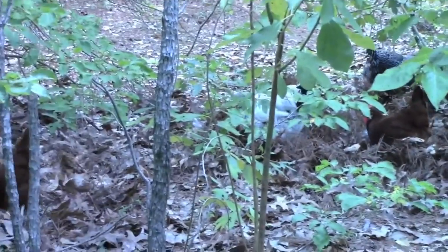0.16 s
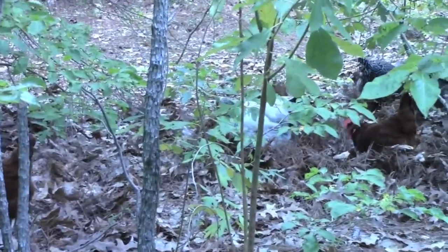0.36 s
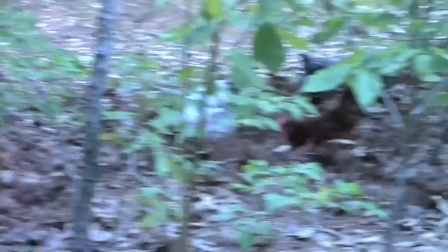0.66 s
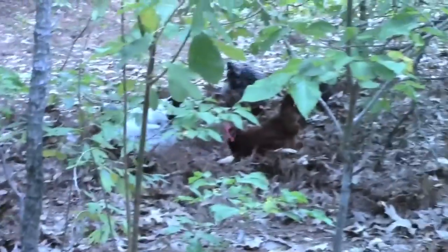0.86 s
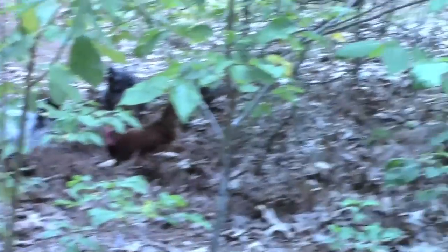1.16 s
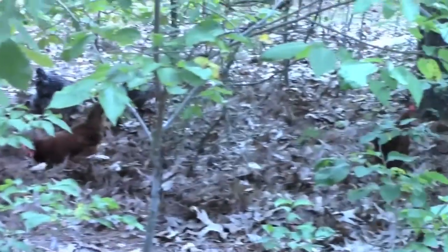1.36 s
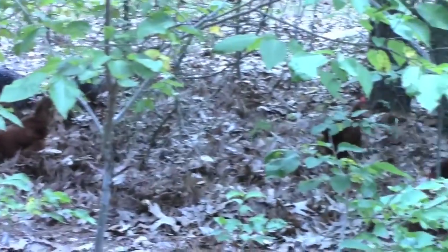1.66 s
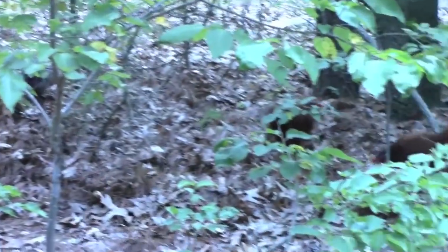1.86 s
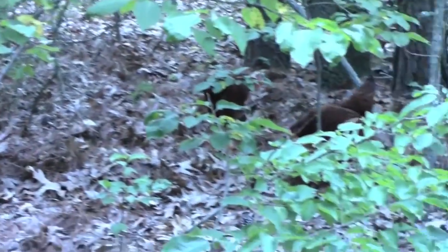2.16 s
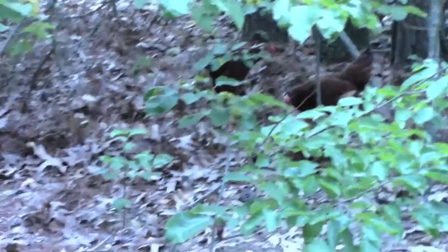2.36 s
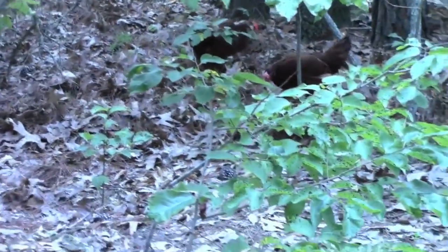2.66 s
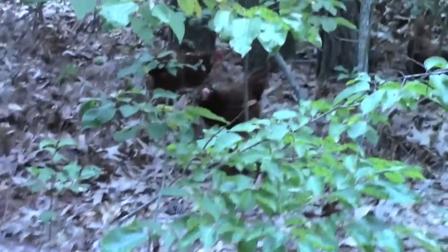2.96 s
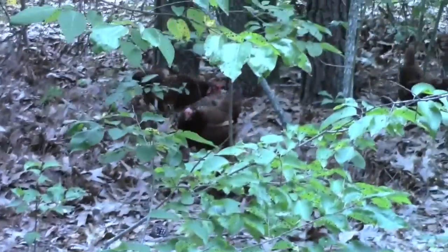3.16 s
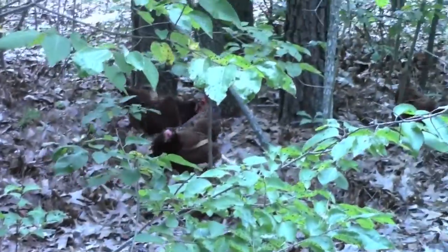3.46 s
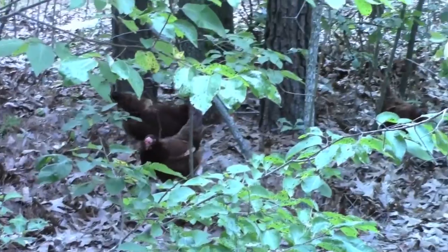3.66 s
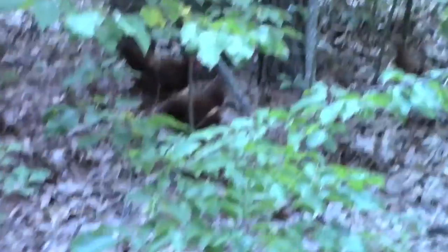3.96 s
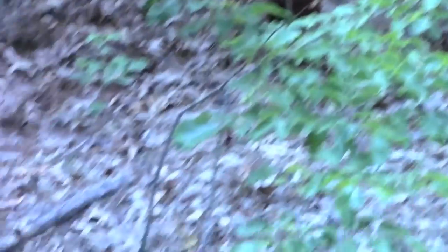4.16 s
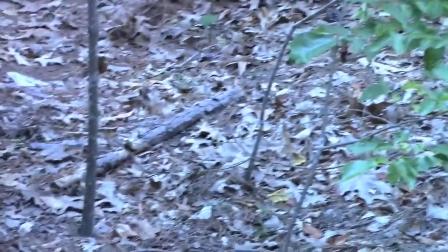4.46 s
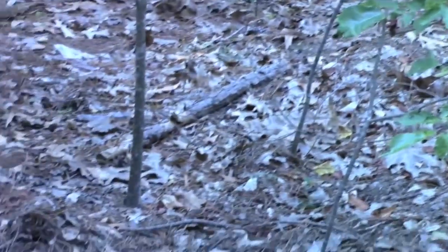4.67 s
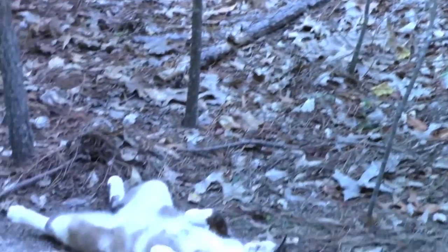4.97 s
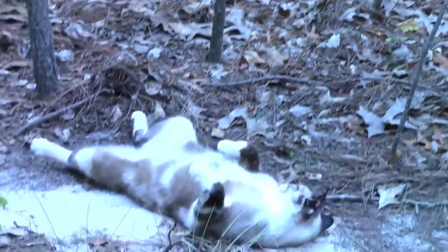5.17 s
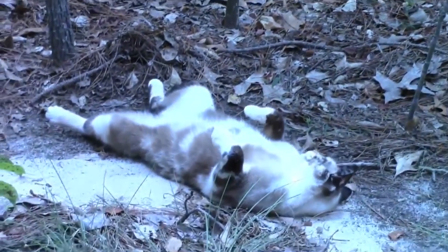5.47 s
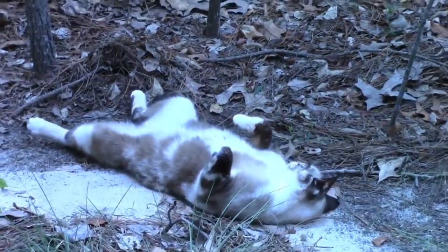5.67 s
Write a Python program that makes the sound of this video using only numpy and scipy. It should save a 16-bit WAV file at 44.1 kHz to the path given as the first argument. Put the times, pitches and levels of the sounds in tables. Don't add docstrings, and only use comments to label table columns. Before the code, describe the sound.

Hens scratch through dry leaves and pine straw in bursts, growing closer and louder, after one early cat mew, over a faint engine hum.

```python
import sys
import numpy as np
from scipy import signal
from scipy.fft import rfft, irfft
from scipy.io import wavfile
from scipy.ndimage import uniform_filter1d

SR = 44100
rng = np.random.default_rng(int(sys.argv[2]) if len(sys.argv) > 2 else 0)


def log_audio(samples):
    frames = np.atleast_2d(samples).T
    limited = np.clip(frames, -1, 1)
    pcm = np.round(limited * 32767).astype(np.int16)
    wavfile.write(sys.argv[1], SR, pcm)


def amplitude_ratio(level_db):
    exponent = np.asarray(level_db, float) / 20
    return 10 ** exponent


N = 257103
T = np.arange(N) / SR

# hz, level_db_per_hz
AIR_SPECTRUM = [(100, -3), (170, 2.5), (205, -1.5), (663, -2), (1310, -8), (1520, -5.5), (2690, -8.5),
                (5110, -10), (8200, -13.5), (10300, -19.5), (15600, -22)]
HISS_SPECTRUM = [(200, -42), (500, -10.5), (800, -1.0)] + AIR_SPECTRUM[4:]
# hz, level_db_per_hz
WASH_SPECTRUM = [(100, -17), (180, 0), (450, -1.5), (700, -5), (1200, -45), (3000, -60)]
RUMBLE_SPECTRUM = [(12, -24), (25, 5.5), (60, 0.5), (130, 2.0), (180, -26), (300, -61)]
# peak_s, extra_db, length_s
WASH_SWELLS = [
    (.12, 2, 0.27),
    (0.757, 3, 0.17),
    (1.72, 1.5, 0.38),
    (3.425, 3, .07),
    (5.2, 1.2, 1),
]
# hz, level_db_per_hz
APART_SPECTRUM = [(12, -39), (20, -13), (65, -2.5), (240, -3.5), (340, -5.5), (800, -13), (1300, -20.5),
                  (2500, -33.5), (5000, -43.5), (16000, -41)]
# peak_s, level_db, length_s
GUSTS = [
    (0.25, -50, .09),
    (0.681, -55, .04),
    (0.9, -57, 0.077),
    (3.4, -63, .05),
    (5.75, -53, 0.06),
]
PUFF_SPECTRUM = [(10, -18), (25, -10), (60, -10), (120, -36), (300, -63)]  # hz, level_db_per_hz
HISS_DB, WASH_DB, RUMBLE_DB, APART_DB = -54.5, -57, -56, -55

# start_s, firing_rate_hz, loudness_db
ENGINE = [(0, 25.53, -51), (.18, 26.2, -45.5), (.45, 26.36, -52.5), (.89, 26.1, -47), (1.64, 26.16, -54),
          (1.88, 26.85, -56.5), (2.32, 26.18, -59), (2.94, 26.5, -49), (3.46, 26.4, -57.5),
          (3.9, 26.2, -52), (4.17, 26.35, -59.5), (4.71, 26.5, -48), (5.1, 26.5, -53), (5.38, 26.1, -51.5),
          (5.83, 26.1, -59)]
# order, relative_db, share_of_wavering, own_flutter_db, fade_db_per_s
ENGINE_ORDERS = [
    (5, 0, 0.84, .6, 0),
    (6, -2.5, 0.5, 2, -1.36),
    (3, -3.5, .3, 2.5, -1),
    (2, -8.5, .3, 4, 0.28),
]

# start_s, pitch_hz, effort_db, mouth_resonance_hz, mouth_gain_db
MEW = [
    (.02, 472, -56, 2000, -4),
    (.038, 476, -51.5, 2120, 0),
    (.09, 537, -55, 2380, 12),
    (.107, 525.6, -54.5, 2310, 12),
    (.175, 559, -53.5, 2370, 9),
    (.24, 543, -55, 2380, 6),
    (.33, 536, -51.5, 1900, -5.5),
    (.398, 506, -58, 1900, -22),
    (.436, 413, -59, 1900, -26),
]
THROAT_HZ, THROAT_WIDTH_HZ, MOUTH_WIDTH_HZ = 980, 500, 1460
MOUTH_SHARPEN = 0.95
CHEST_DB = -12

# start_s, peak_db, pitch_hz
STRAW_TICKS = [(0.3247, -29.5, 4360), (0.579, -34, 7300), (1.0694, -27, 3970), (1.3671, -34, 3400),
               (1.5433, -25, 6600), (1.5701, -27, 6500), (1.643, -22.5, 4200), (1.849, -31, 5000),
               (2.0069, -30, 3500), (2.095, -32, 5000), (2.217, -28, 6000), (2.3988, -35, 7990),
               (2.6826, -34, 7700), (3.338, -19.5, 4200), (3.5349, -28, 4700), (3.8390, -31, 4970),
               (3.8515, -20, 7000), (4.1014, -29, 4200), (5.035, -31, 4110), (5.13, -27, 8500)]
STRAW_RING_MS, STRAW_KNOCK_DB = 0.098, -20.5
# start_s, peak_db, pitch_hz, ring_ms, low_knock_db
TWIGS = [(1.768, -24.5, 9600, .4, -20), (1.775, -30, 4000, .4, -15), (2.1630, -29, 4000, .46, -6),
         (2.805, -30, 3230, 0.68, -8), (2.9530, -34, 3930, .6, -17), (3.2450, -32, 3970, .89, -16),
         (3.4225, -24, 3560, 0.55, -13), (3.581, -24, 9500, 0.31, -5), (3.5823, -23.5, 9800, .4, -9),
         (3.583, -25, 13500, .4, -20), (3.5832, -24.5, 3500, 0.46, -9), (3.6966, -21.5, 5100, .5, -30),
         (3.6967, -27, 8040, .3, -34), (3.6965, -27, 13000, .25, -30), (3.8426, -20.5, 3300, .8, -11),
         (3.8453, -13.5, 6500, 0.12, -11.5), (3.856, -25, 9400, 1.5, -12), (4.3690, -31, 3830, 0.94, 3),
         (4.3870, -23, 6000, 0.45, 7), (4.8910, -34, 8200, .52, -20), (4.9300, -34, 10000, .5, -22),
         (5.0986, -29, 7050, 0.56, -20), (5.417, -25, 9900, 1.0, -20)]

LAYER_HZ = [
    1890,
    4200,
    7780,
    13300,
]
# hz, level_db
LITTER_COLOUR = [(500, -25), (900, -21), (1500, -14), (2500, -10.5), (3800, -8), (5000, -12.5), (6300, -7),
                 (7600, -9.5), (10000, -3.5), (12500, -6), (15000, -20)]
# start_s, extra_db, fade_s
CLAW_ONSETS = [(0.44, 3, .02), (1.505, 4, .04), (2.715, 4, .015), (2.80, 3, .015), (2.953, 3, .02),
               (3.415, 3, .025), (3.62, 3, .012), (3.765, 3, .02), (4.10, 2.5, .03), (4.366, 2.5, .02),
               (4.632, 3, .02), (5.523, 3, .015), (5.31, 3, .025), (5.405, 2.5, .02)]
# peak_s, effort_db, rise_s, fall_s, fine_straw_db
FLOCK = [(0, -52.5, .1, 0.26, 5.5), (.13, -58, .1, .1, -2), (.23, -45.5, 0.089, 0.1, 2.5),
         (.36, -54, 0.058, 0.046, 0), (.47, -57, .025, 0.073, 4.5), (.57, -47.5, 0.11, 0.32, 3.5),
         (.74, -50.5, 0.092, 0.098, 0.5), (.9, -51, 0.14, 0.35, 1.5), (1.06, -53.5, 0.16, 0.11, -1),
         (1.23, -53.5, 0.088, 0.09, 3.5), (1.45, -51.5, 0.066, 0.049, 0), (1.55, -48, 0.083, 0.32, -0.5),
         (1.77, -51.5, 0.17, 0.075, 8.5), (1.96, -49, 0.12, 0.15, 0.5), (2.17, -47, 0.12, 0.094, 2),
         (2.23, -51, .05, 0.04, 4), (2.295, -52.5, .03, 0.027, -0.5)]
# peak_s, effort_db, rise_s, fall_s, fine_straw_db
PAIR = [(2.7, -53.5, .12, 0.096, 2.5), (2.8, -50.5, 0.08, 0.21, 3), (2.96, -48.5, 0.075, 0.43, 1),
        (3.16, -47, 0.061, 0.11, 2.5), (3.25, -43, 0.17, 0.11, 0), (3.44, -45.5, 0.1, .12, 0.5),
        (3.56, -47, 0.055, .15, 2.5), (3.68, -47, .07, 0.086, -3.5), (3.8, -47, 0.092, 0.14, 2),
        (3.849, -37, 0.017, 0.039, 1), (3.89, -42.5, 0.022, 0.18, 1), (4.16, -44.5, 0.091, 0.36, 1.2),
        (4.4, -40.5, 0.075, 0.12, 1.8), (4.51, -51, 0.091, 0.052, 4)]
# peak_s, effort_db, rise_s, fall_s, fine_straw_db
NEAREST = [
    (4.65, -53, 0.084, .1, -1),
    (4.8, -53, 0.23, .2, 1.5),
    (4.92, -52, 0.066, 0.064, 0.5),
    (5.0, -53.5, .1, .15, -1.5),
    (5.17, -49.5, 0.12, 0.042, -1),
    (5.235, -36.5, 0.056, 0.11, -4),
    (5.32, -39.5, 0.098, 0.055, -2),
    (5.39, -38, 0.056, 0.065, 0),
    (5.64, -40, 0.28, 0.24, -1.5),
    (5.83, -44, 0.16, .2, 0),
]
STROKE_BEND = 1.42
REST_DB, REST_STRAW_DB = -66, 7.5
USUAL_DB = -50
COARSE_DB, COARSE_PER_DB, COARSE_PER_STRAW = -3, -0.1, 0.24
DUST_DB, DUST_PER_DB, DUST_PER_STRAW = -7.5, 0.05, 0.97


def evened(x):
    return x / np.sqrt(np.mean(x ** 2) + 1e-20)


def read(points, hz):
    f, value = np.transpose(points)
    return np.interp(np.log(hz + 1), np.log(f + 1), value)


def columns(rows, t):
    s, *values = np.transpose(rows)
    return [np.interp(t, s, v) for v in values]


def drift(seconds):
    size = max(int(seconds * SR), 1)
    once = uniform_filter1d(rng.standard_normal(N), size)
    return evened(uniform_filter1d(once, size))


def coloured(points):
    hz = np.fft.rfftfreq(N, 1 / SR)
    spectrum = rfft(rng.standard_normal(N)) * amplitude_ratio(read(points, hz))
    return evened(irfft(spectrum, N))


def swell(peak_s, length_s):
    return np.exp(-((T - peak_s) / length_s) ** 2)


def harmonics(hz, levels, orders, jitter):
    turns = np.cumsum(hz * (1 + jitter[:len(hz)])) / SR
    out = 0
    for k, db in zip(orders, levels):
        out = out + np.sqrt(2) * amplitude_ratio(db) * np.sin(2 * np.pi * (k * turns + rng.random()))
    return out


def click(hz, ring_s, grit):
    t = np.arange(300) / SR
    wobble = np.cumsum(rng.standard_normal(300)) * grit
    attack = 1 - np.exp(-t * hz * 5.3)
    return np.sin(2 * np.pi * hz * t + wobble) * np.exp(-t / ring_s) * attack


def trees(x, t60, db, count=8):
    t = np.arange(SR // 5) / SR
    turn = (T * 40).astype(int) % count
    out = x.copy()
    for k in range(count):
        tail = rng.standard_normal(len(t)) * amplitude_ratio(-60 * t / t60) * (t > .001)
        out += amplitude_ratio(db) * signal.oaconvolve(x * (turn == k), tail / np.linalg.norm(tail))[:N]
    return out


def air():
    wash_db = WASH_DB + sum(db * swell(s, length) for s, db, length in WASH_SWELLS)
    common = amplitude_ratio(HISS_DB + 0.5 * drift(0.21)) * coloured(HISS_SPECTRUM)
    common += amplitude_ratio(wash_db) * coloured(WASH_SPECTRUM)
    common += amplitude_ratio(RUMBLE_DB + 2.0 * drift(0.42)) * coloured(RUMBLE_SPECTRUM)
    puffs = sum(amplitude_ratio(db) * swell(s, length) for s, db, length in GUSTS)
    apart = amplitude_ratio(APART_DB) * coloured(APART_SPECTRUM) + puffs * coloured(PUFF_SPECTRUM)
    return np.array([common + apart, common - apart])


def engine():
    hz, loud = columns(ENGINE, T)
    wavering = loud - loud.mean()
    levels = []
    for _, db, share, flutter_db, fade_db in ENGINE_ORDERS:
        levels.append(loud.mean() + db + share * wavering + flutter_db * drift(0.076) + fade_db * T)
    orders = [row[0] for row in ENGINE_ORDERS]
    hum = harmonics(hz, levels, orders, .002 * drift(.1))
    fourth = np.sin(2 * np.pi * 4 * np.cumsum(hz) / SR)
    hum = hum + amplitude_ratio(-63.0 + 1.2 * drift(0.24)) * fourth
    return np.array([hum * amplitude_ratio(0.4), np.roll(hum, 24) * amplitude_ratio(-0.1)])


def cat():
    start, end = round(MEW[0][0] * SR), round(MEW[-1][0] * SR)
    t = T[start:end]
    hz, effort, mouth_hz, mouth_db = columns(MEW, t)
    partial = np.arange(1, 6)[:, None] * hz
    throat = amplitude_ratio(-10 * ((partial - THROAT_HZ) / THROAT_WIDTH_HZ) ** 2)
    mouth_width = MOUTH_WIDTH_HZ * amplitude_ratio(-MOUTH_SHARPEN * np.maximum(mouth_db, 0))
    mouth = amplitude_ratio(mouth_db - 10 * ((partial - mouth_hz) / mouth_width) ** 2)
    levels = effort + 10 * np.log10(throat ** 2 + mouth ** 2)
    levels[0] = effort + CHEST_DB
    voice = harmonics(hz, levels, range(1, 6), 0.0044 * drift(0.0091))
    voice = voice * signal.windows.tukey(len(t), .08)
    out = np.zeros(N)
    out[start:end] = voice * amplitude_ratio(1.1 * drift(0.01)[:len(t)])
    return out


def snaps():
    out = np.zeros(N + 300)
    stems = [(*tick, STRAW_RING_MS, STRAW_KNOCK_DB) for tick in STRAW_TICKS]
    for s, db, hz, ring_ms, knock_db in list(TWIGS) + stems:
        ring = click(hz, ring_ms / 1000, grit=.2)
        sound = ring + amplitude_ratio(knock_db) * click(2600, .0005, grit=.1)
        out[round(s * SR):][:300] += amplitude_ratio(db) * sound / abs(sound).max()
    no_bass = signal.butter(2, 800, "high", fs=SR, output="sos")
    return trees(signal.sosfilt(no_bass, out[:N]), t60=0.041, db=-5, count=4)


def strokes():
    t = T[::40]
    power = amplitude_ratio(2 * REST_DB) + 0 * t
    straw = power * REST_STRAW_DB
    for s, db, rise, fall, straw_db in list(FLOCK) + list(PAIR) + list(NEAREST):
        away = abs(t - s) / np.where(t < s, rise, fall)
        stroke = amplitude_ratio(2 * (db - 10 * away ** STROKE_BEND))
        power = power + stroke
        straw = straw + stroke * straw_db
    effort = np.interp(T, t, 10 * np.log10(power))
    straw = np.interp(T, t, straw / power)
    more = effort - USUAL_DB
    coarse = COARSE_DB + COARSE_PER_DB * more + COARSE_PER_STRAW * straw
    dust = DUST_DB + DUST_PER_DB * more + DUST_PER_STRAW * straw
    return effort, coarse, straw, dust


def litter(count=34):
    effort, coarse, straw, dust = strokes()
    clumps_db = .8 * drift(.003) + .4 * drift(.008)
    for s, db, fade in CLAW_ONSETS:
        clumps_db += db * (T > s) * np.exp(-abs(T - s) / fade)
    layers = np.array([coarse, 0 * effort, straw, dust])
    out = np.zeros(N)
    for hz in np.geomspace(500, 15600, count):
        place = np.interp(np.log(hz), np.log(LAYER_HZ), range(4))
        share = np.clip(1 - abs(place - np.arange(4)), 0, 1)
        at = np.flatnonzero(rng.random(N) < .35 * hz / SR)
        big = rng.exponential(1, N)[at]
        sign = np.sign(np.sin(1e6 * big))
        train = np.zeros(N)
        train[at] = sign * amplitude_ratio(2.03 * np.minimum(big, 4.6))
        train = evened(train)
        level_db = effort + clumps_db + share @ layers
        train[at] *= amplitude_ratio(level_db[at] + read(LITTER_COLOUR, hz))
        grain = click(hz, 1.86 / hz, grit=0)
        out += signal.oaconvolve(train, grain / np.linalg.norm(grain))[:N]
    return trees(out, t60=0.081, db=-6.5)


def scene():
    background = air() + engine() + cat()
    near = litter() + snaps()
    lean = amplitude_ratio(-29) * drift(0.033) * near
    return background + np.array([near + lean, near - lean])


def band_limit(x):
    return signal.sosfilt(signal.butter(12, 15740, fs=SR, output="sos"), x)


def record(dry):
    lowpass = signal.firwin(301, 15850, window=("kaiser", 8), fs=SR)
    limited = signal.oaconvolve(dry, lowpass[None], "same")
    return band_limit(limited)


dry = scene()
out = record(dry)
log_audio(out)
```